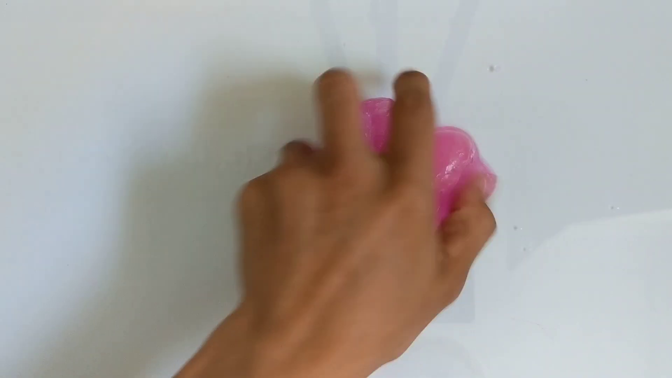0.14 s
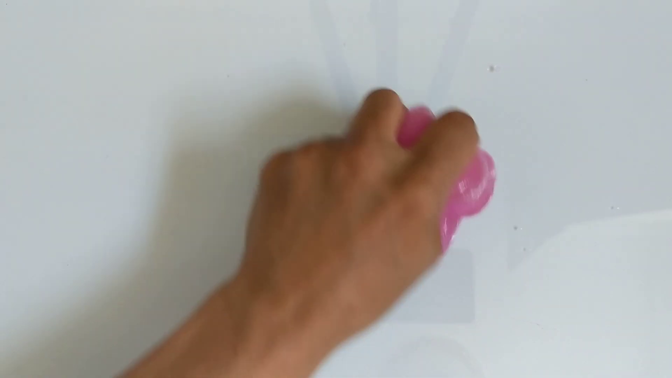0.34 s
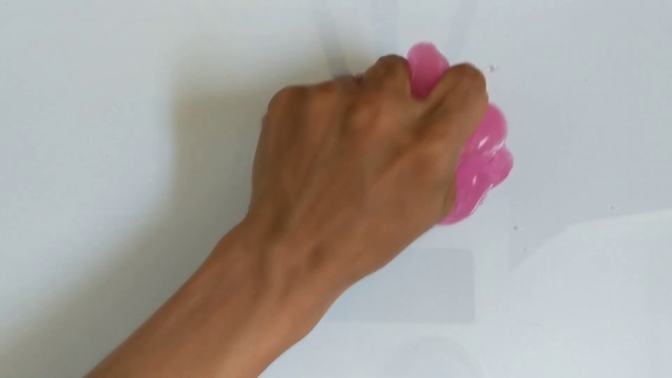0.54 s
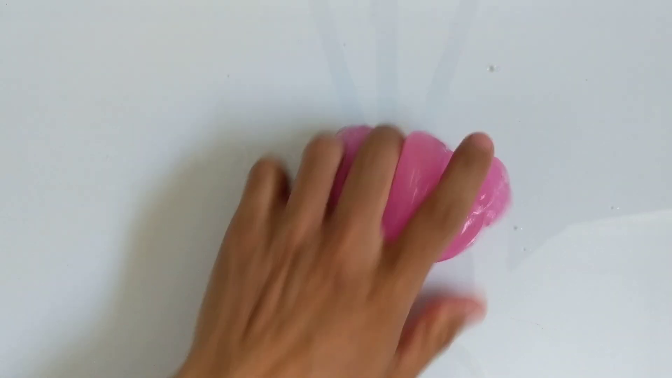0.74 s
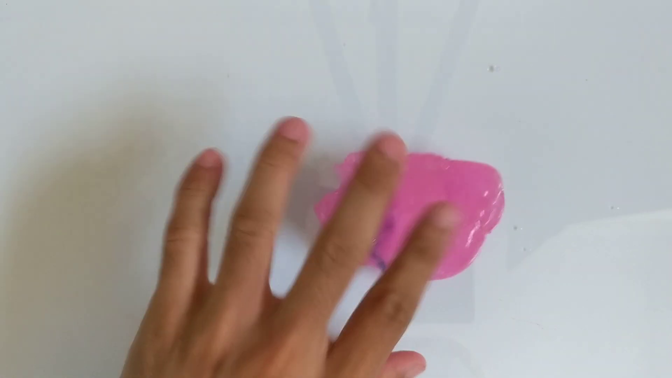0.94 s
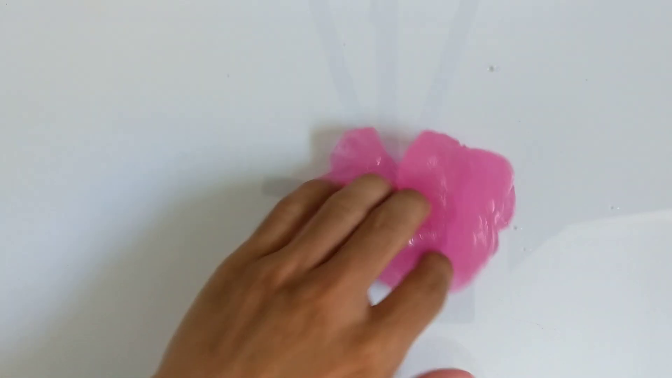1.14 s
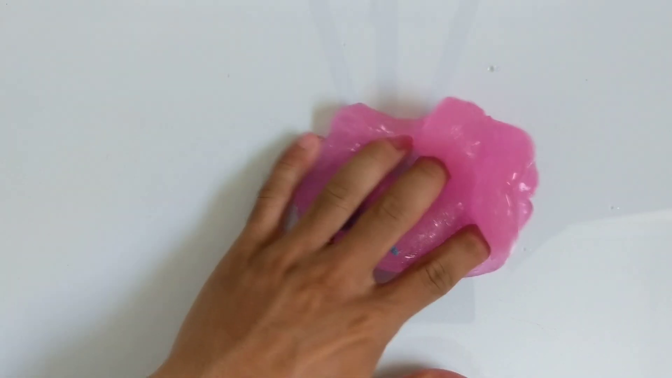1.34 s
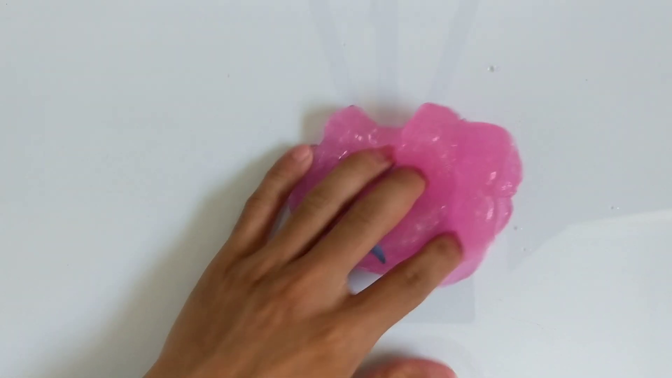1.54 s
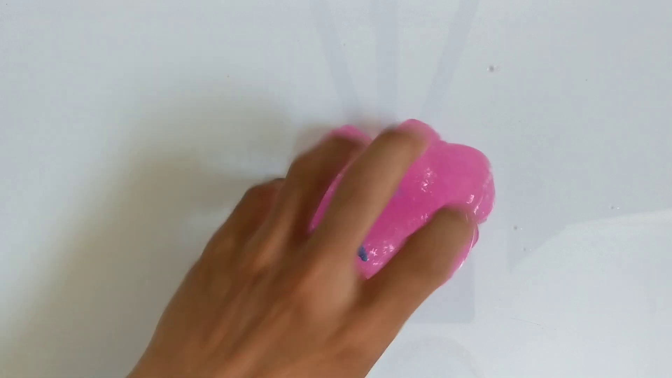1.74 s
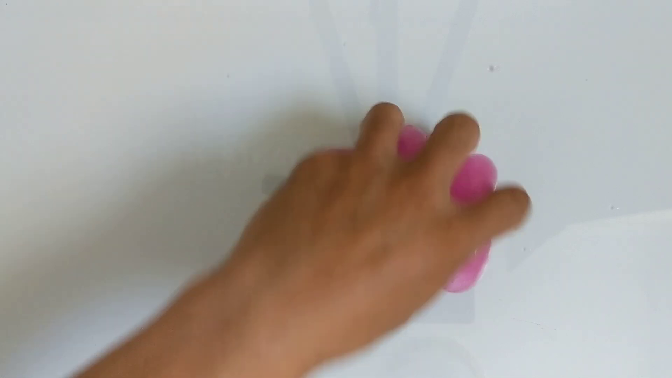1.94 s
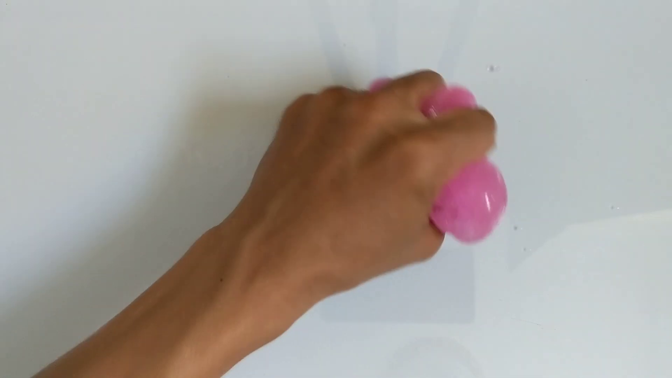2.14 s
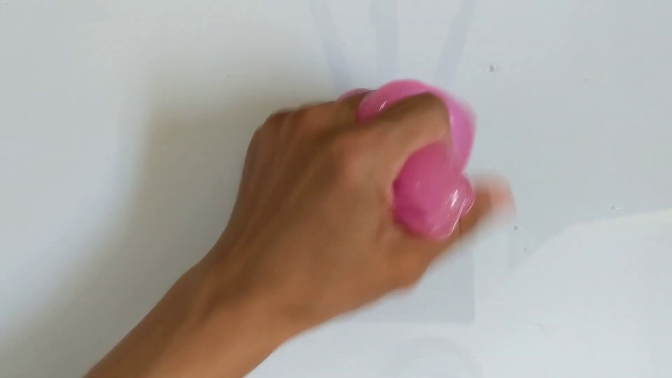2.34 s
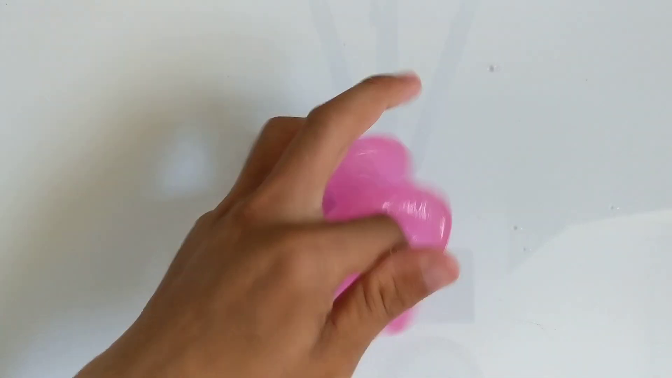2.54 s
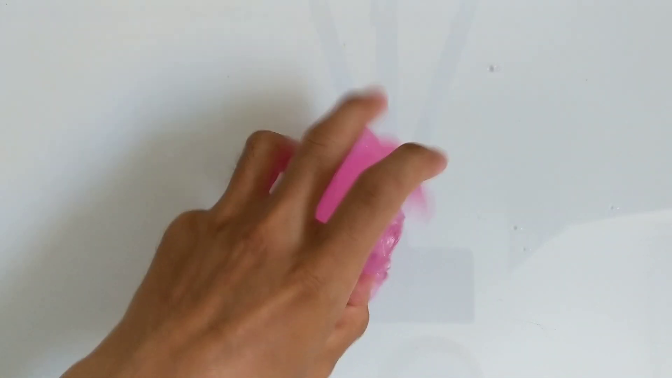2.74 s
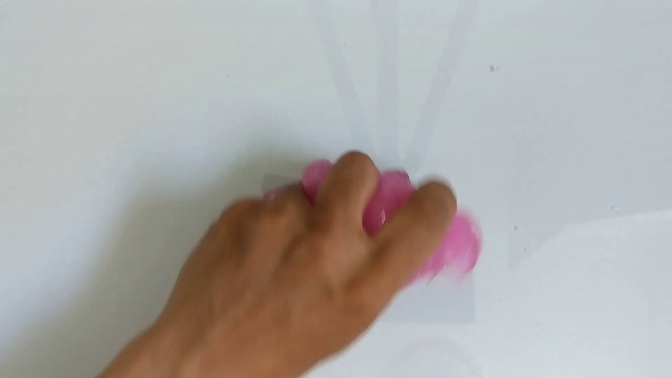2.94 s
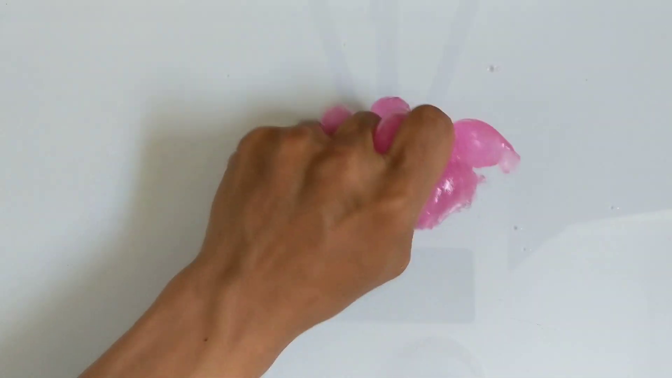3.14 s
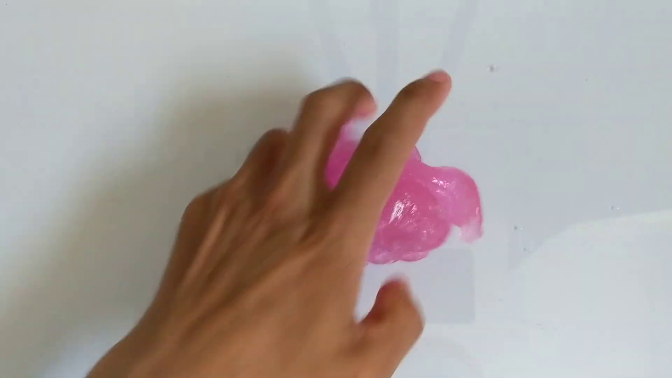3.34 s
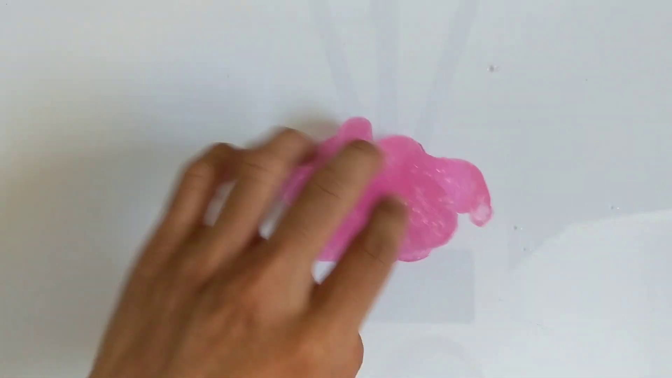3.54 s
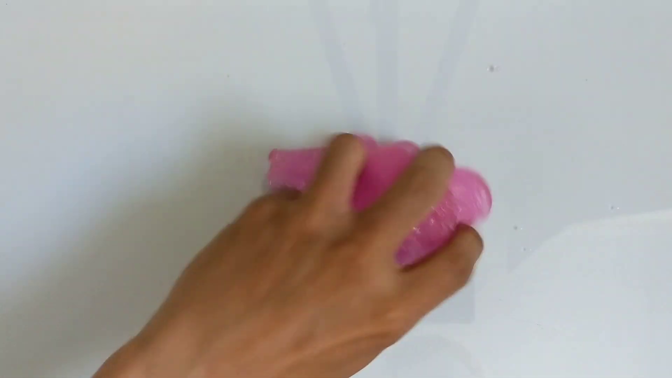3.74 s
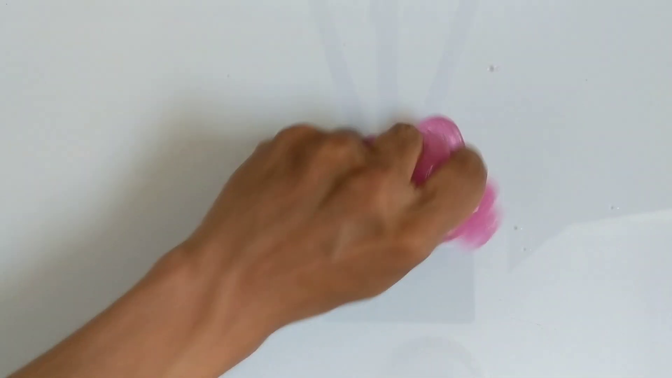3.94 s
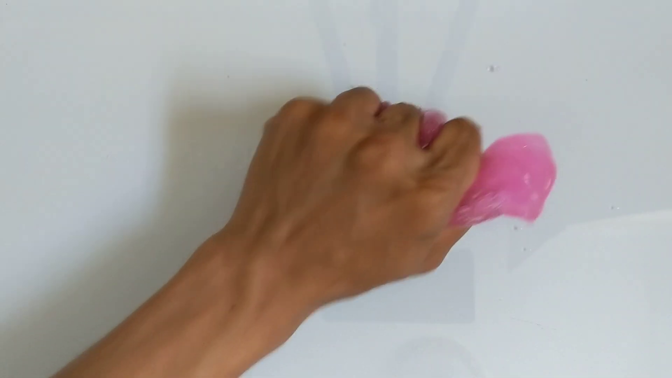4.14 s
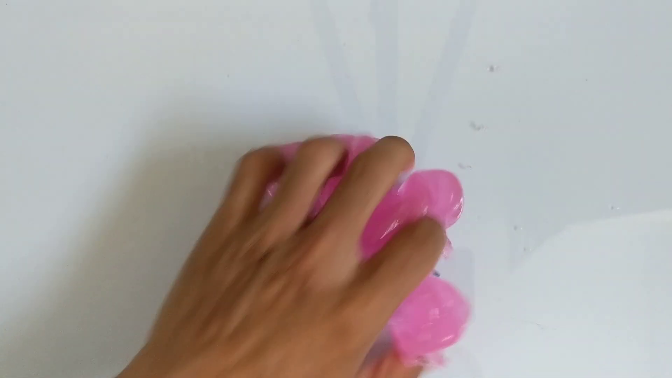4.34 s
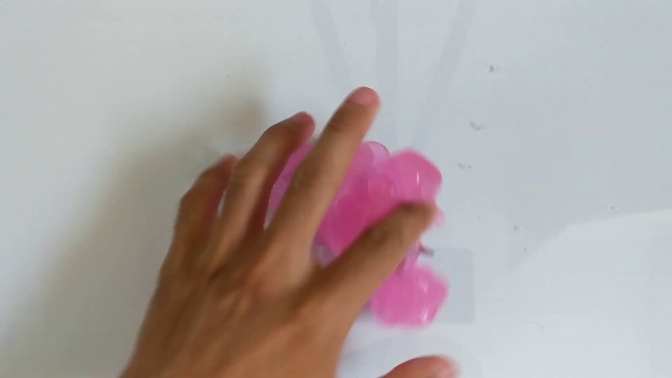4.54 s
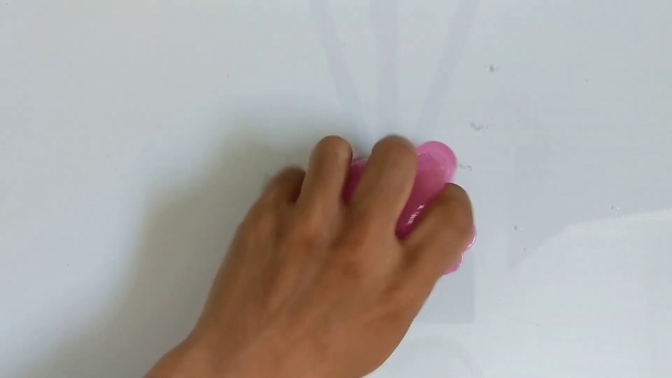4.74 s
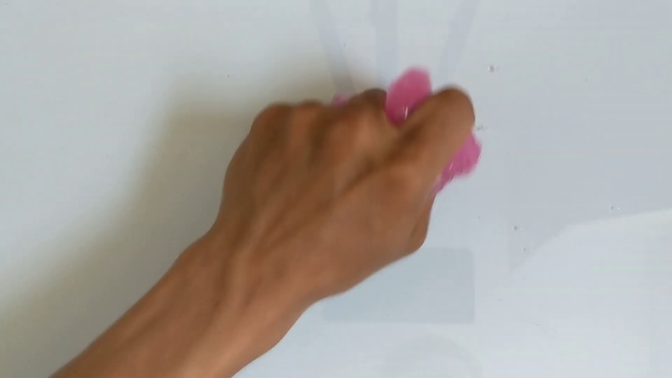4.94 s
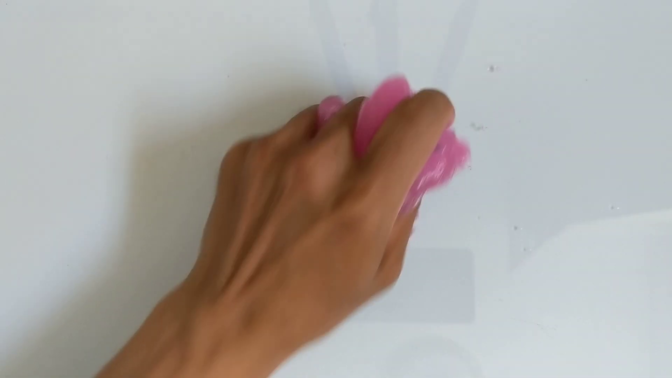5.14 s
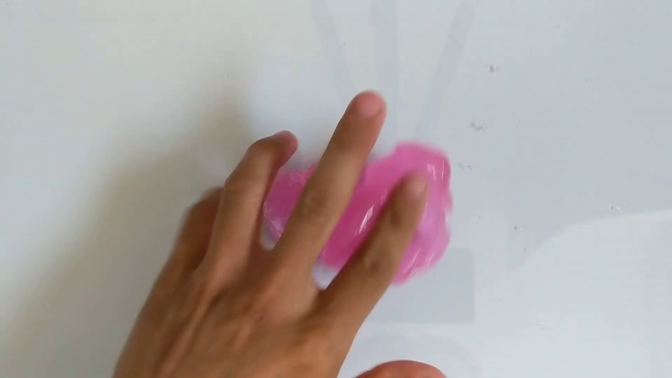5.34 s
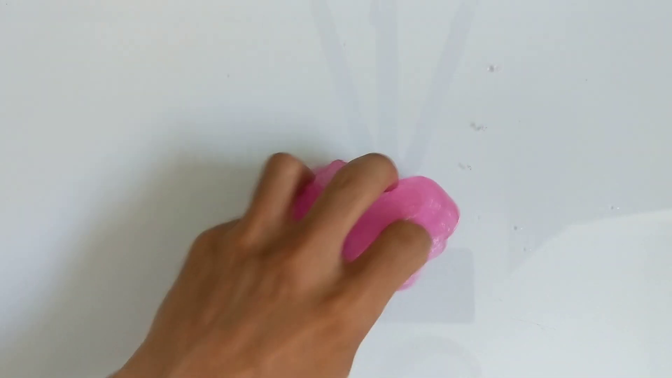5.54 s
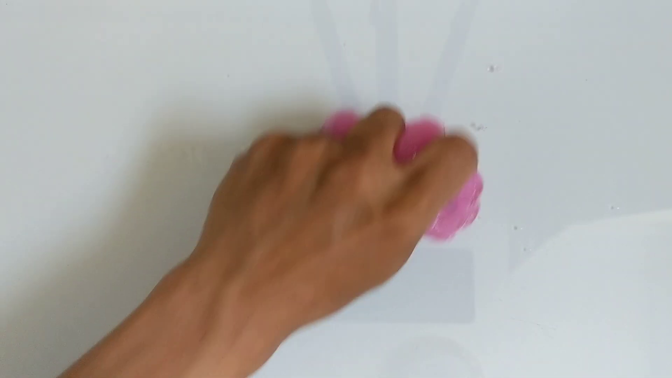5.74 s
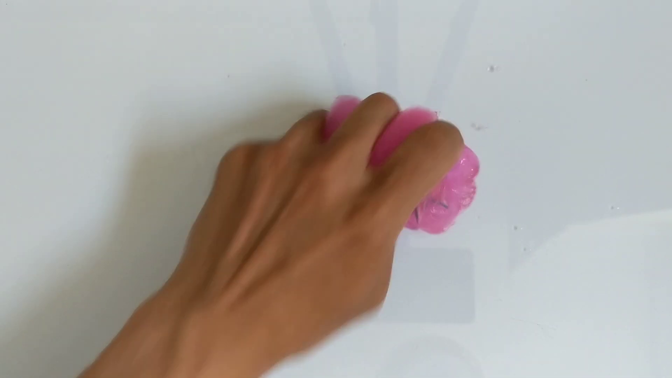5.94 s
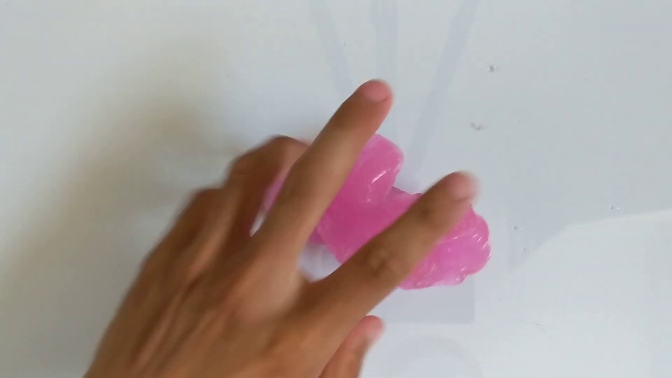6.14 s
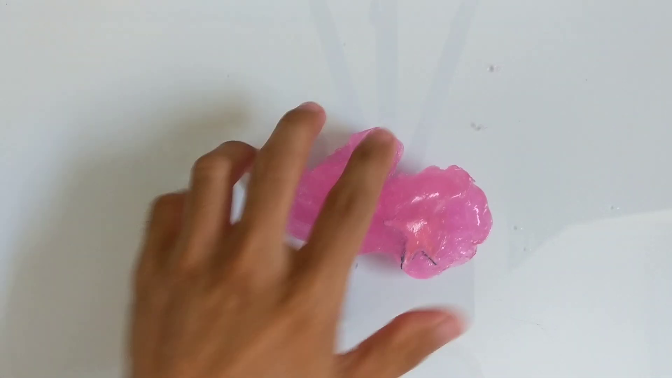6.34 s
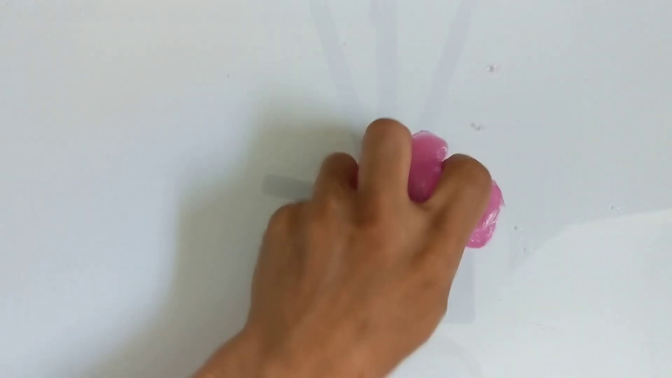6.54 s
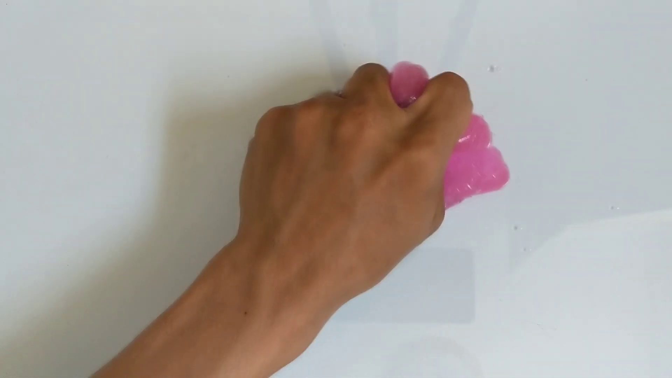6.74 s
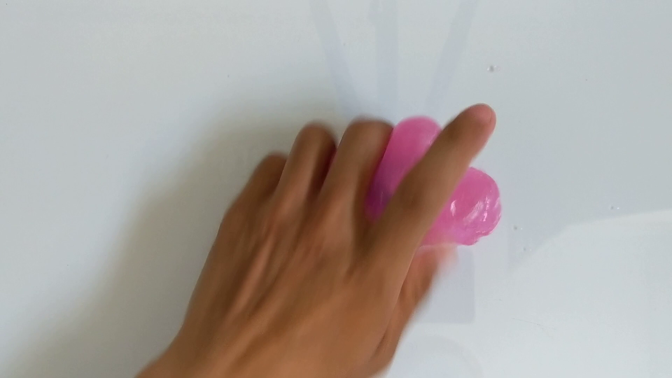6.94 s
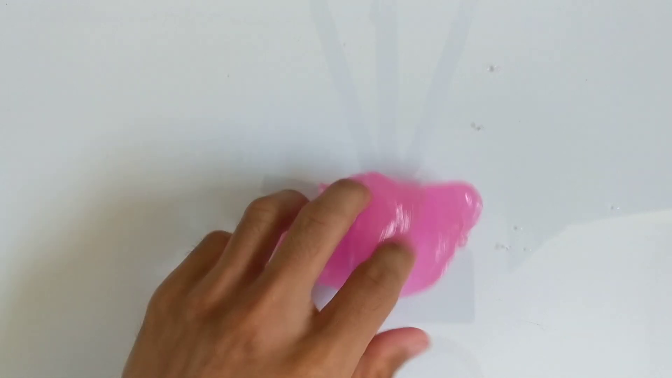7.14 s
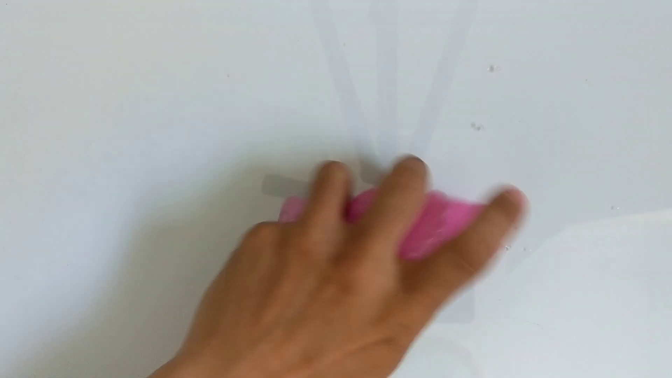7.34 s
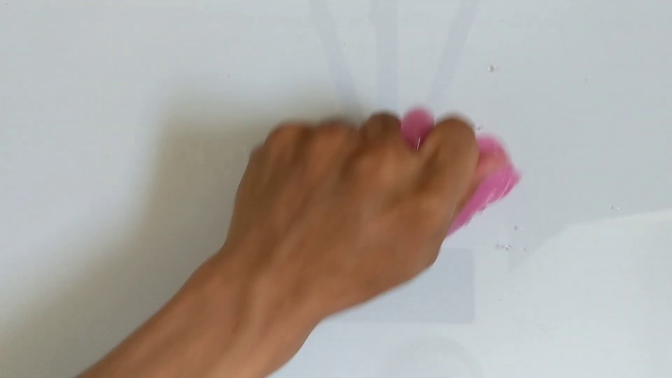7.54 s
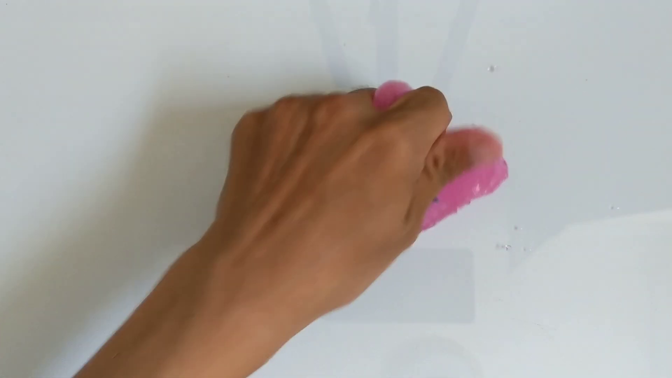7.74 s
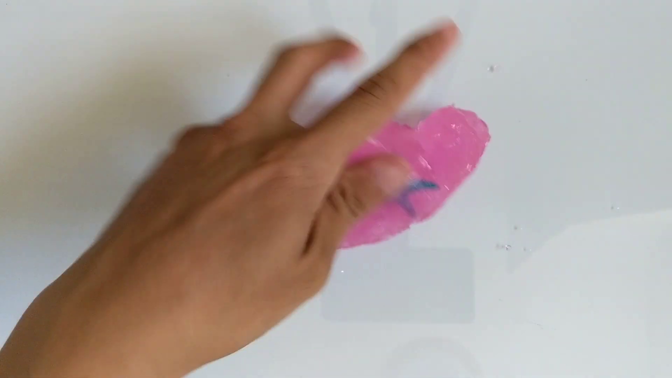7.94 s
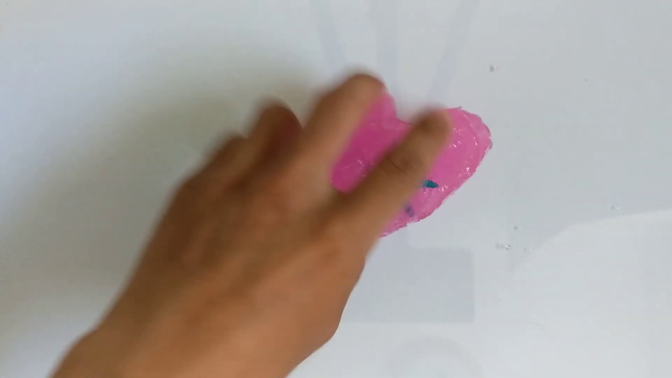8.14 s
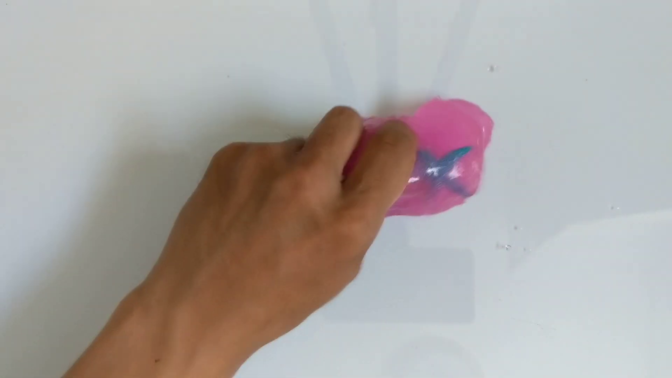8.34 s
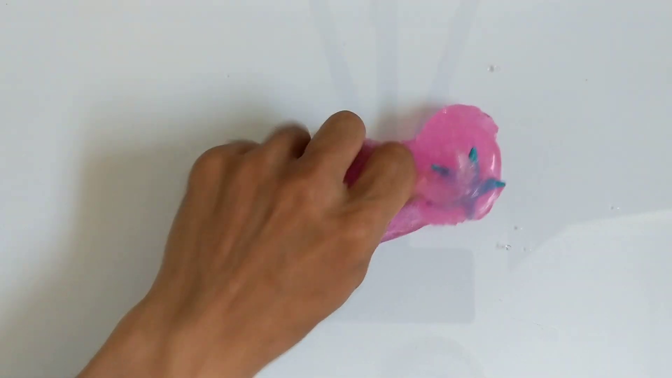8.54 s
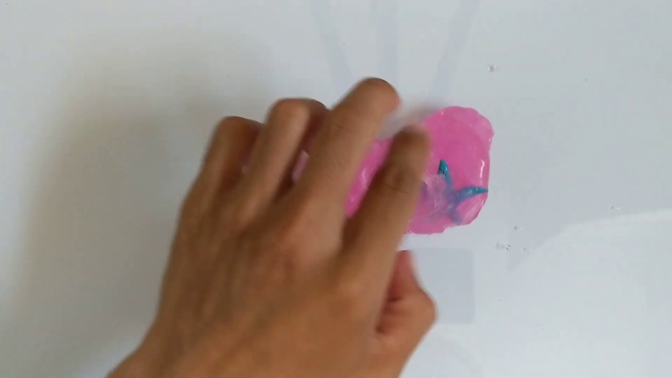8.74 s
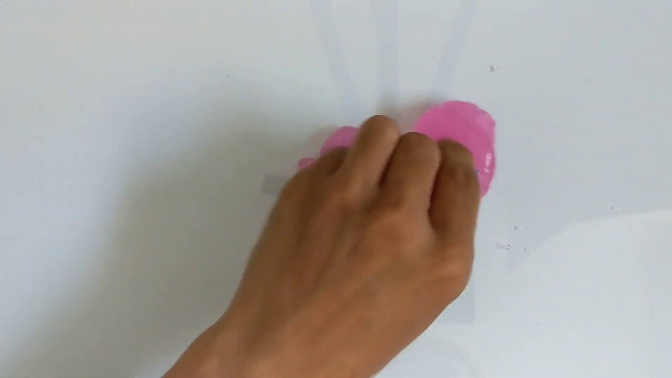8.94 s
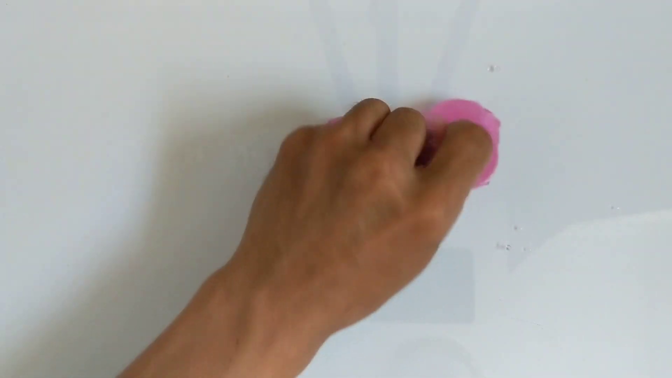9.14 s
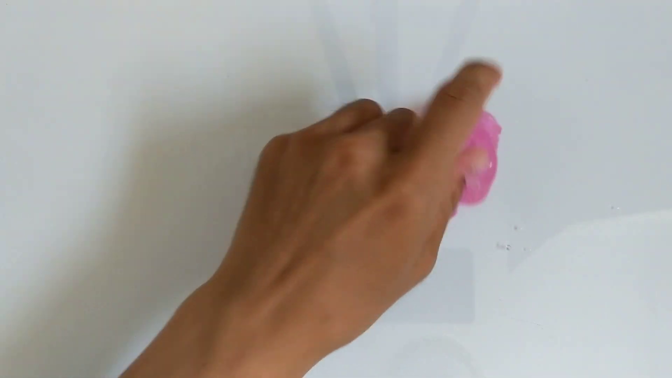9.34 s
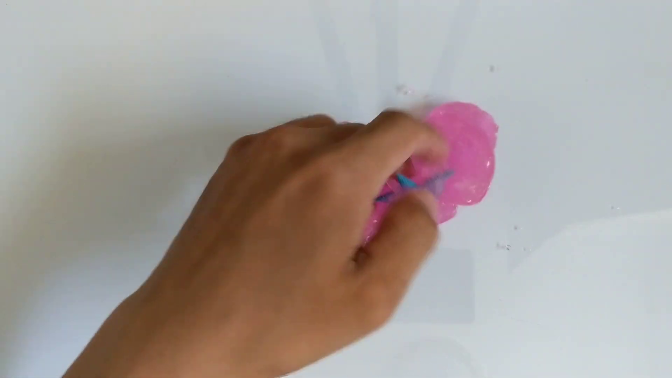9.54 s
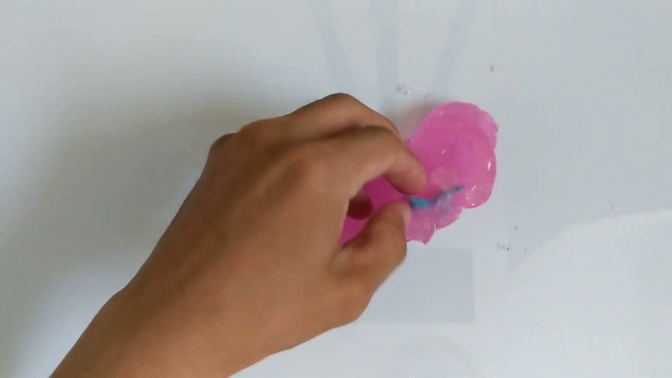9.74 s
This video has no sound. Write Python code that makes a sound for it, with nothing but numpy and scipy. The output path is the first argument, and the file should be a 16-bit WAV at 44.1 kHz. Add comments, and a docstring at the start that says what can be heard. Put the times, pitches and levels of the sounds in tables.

```python
"""A small, live room: a hand kneads sticky slime on a hard tabletop.
Each squeeze bursts trapped air pockets, which pop at their own pitch; the table mirrors them and the
walls ring on. Between pops the slime squeaks, squelches and crackles as it peels off skin and table.
Once the heel of the hand judders on the table. Low rumble, hiss and a brief faint hum lie beneath."""
import sys
import numpy as np
from scipy import signal
from scipy.fft import rfft, irfft, next_fast_len
from scipy.io import wavfile
from scipy.ndimage import uniform_filter1d, map_coordinates

SR = 44100
rng = np.random.default_rng(int(sys.argv[2]) if len(sys.argv) > 2 else 0)


def wav_record(signal):
    """Record a signal, one row per channel, as 16-bit PCM in the file named by sys.argv[1]."""
    frames = np.transpose(np.atleast_2d(signal))
    bounded = np.clip(frames, -1, 1)
    # unit amplitude maps onto the largest positive 16-bit level
    quanta = np.round(bounded * 32767).astype(np.int16)
    wavfile.write(sys.argv[1], SR, quanta)


N = 435266
TOP_HZ = 17200

# tearing film: f/Hz, level/dB
SNAP_SPECTRUM = [(100, -21), (300, -44), (1200, -12), (5000, 3.5), (9000, -2), (16000, -12)]
# large pockets, two rows for a double one: t/s, ring level/dB, f/Hz, decay/cycles, snap level/dB
POPS = [(.383, -13.5, 7160, 1.2, -28), (.723, -28, 5330, 1.8, -55), (0.7676, -23.5, 2930, 7.7, -50),
        (0.767, -14.5, 1310, 2.3, -29), (.7695, -35, 765, 2.2, -50), (1.297, -17.5, 7400, 0.59, -37),
        (1.3487, -22, 5170, 1.4, -43), (1.359, -25, 7000, 1, -38), (1.3708, -13.5, 3170, 0.58, -30),
        (1.371, -25.5, 1170, 2.6, -39), (1.3958, -11.5, 3000, 1.5, -17), (1.419, -15, 10500, 1, -35),
        (1.424, -7.5, 6330, 0.75, -33), (1.4653, -6, 5300, 2, -48), (1.4657, -10.5, 10100, 1.5, -48),
        (1.47, -12, 9100, 0.78, -36), (2.028, -24, 6990, 1.4, -44), (2.125, -21, 6680, .8, -44),
        (2.066, -31, 900, 0.9, -40), (2.2116, -12.5, 2060, 1.1, -30), (2.2104, -8.5, 3970, 1.6, -27),
        (2.2258, -24, 9000, .8, -24), (2.243, -15, 6050, 7.8, -23), (2.2826, -3.5, 6940, 2, -36),
        (2.4419, -23.5, 2840, 1.8, -36.5), (2.4852, -16, 7530, 1.1, -50), (2.639, -23.5, 5300, 2.1, -39),
        (3.0422, -26, 4330, 1.7, -48), (3.101, -5.5, 4520, 1.9, -22), (3.162, -23, 11000, .8, -34),
        (3.1732, -17, 2630, 1.8, -31), (3.1967, -6.5, 9300, 1.3, -33), (3.3778, -23.5, 1800, 3.2, -46),
        (3.841, -22, 7600, 2.7, -40.5), (3.861, -25, 1530, 0.44, -48), (3.956, -10.5, 2880, 2.2, -41),
        (3.978, -14.5, 2480, 1.6, -33), (3.9978, -9.5, 6240, 2.3, -19), (3.9984, -15, 8060, 0.94, -18.5),
        (4.039, -6.5, 4300, 1.95, -29), (4.0824, -14, 2600, 2.1, -40), (4.0833, -18.5, 5100, 11, -44),
        (4.1332, -8, 8300, 0.54, -32), (4.1764, -15, 11600, 1.3, -31), (4.197, -24, 4100, 2, -44),
        (4.25, -15.5, 10200, 4, -30.5), (4.375, -25.5, 1395, 0.92, -39), (4.492, -19.5, 4870, 0.84, -47),
        (4.8584, -13, 1440, 1.43, -47), (4.91, -8, 3170, 2.1, -40), (4.9102, -9, 5700, 1.3, -48),
        (4.9119, -13, 3220, 2.2, -42), (4.96, -18.5, 7850, 2.8, -43), (4.969, -20, 7200, 2.2, -41),
        (5.0728, -14.5, 4130, 0.57, -61), (5.1083, -17.5, 4470, 0.63, -40), (5.232, -29, 6470, 1.6, -50),
        (5.421, -31.5, 3700, 4, -52), (5.483, -25.5, 2200, 0.46, -55), (5.7873, -7, 5170, 2.3, -26.5),
        (6.497, -29.5, 1020, 0.49, -51), (6.571, -22, 6950, 1.2, -42), (6.6415, -21, 10500, 1, -47),
        (6.6944, -19.5, 1570, 0.97, -54), (6.77, -21.5, 2700, 0.63, -46), (6.941, -17, 6660, 3.2, -37),
        (6.973, -14, 2700, 1.8, -38), (6.973, -22, 1270, 2.2, -46), (6.9788, -16, 1130, 3.2, -46),
        (6.9798, -31, 620, 2.3, -42), (6.9796, -18.5, 2500, 6.5, -38), (6.9808, -12, 3000, 3.5, -24.5),
        (7.5843, -7, 4840, 1.15, -33), (7.585, -21, 1040, .6, -45), (7.586, -7.5, 4260, 2, -18.5),
        (7.63, -31, 800, 1, -50), (7.6437, -13.5, 2360, 1.2, -36), (7.6677, -10.5, 7400, 2.5, -23.5),
        (7.717, -20.5, 2210, 1.2, -41), (7.77, -32, 1270, 1.5, -54), (8.41, -32, 2160, .9, -43),
        (8.452, -27, 4800, 1.1, -37), (8.5002, -9.5, 6600, 1.2, -30), (8.5032, -16, 4950, 2.3, -37),
        (8.804, -29, 5800, 5, -58), (9.095, -38, 1050, .7, -58), (9.103, -33.5, 7400, 2.3, -50),
        (9.2234, -36.5, 830, 1.3, -55), (9.25, -20, 9000, 1.1, -46), (9.272, -31.5, 3600, 4, -48),
        (9.392, -40, 5230, 1.6, -39.5)]

def pops():
    """The film strains and tears with a snap, and the opened pocket rings."""
    strain_s, tear_s = 0.00062, 0.00074
    lead = SR // 200
    track, t = np.zeros(N), np.arange(-lead, SR // 40) / SR
    tear = np.exp(np.where(t < 0, t / strain_s, -t / tear_s))
    for s, ring_db, hz, cycles, snap_db in POPS:
        ring = cavity(np.maximum(t, 0), hz, max(cycles, .5), glide=rng.normal(0, 0.053))
        snap = noise(SNAP_SPECTRUM, len(t)) * tear
        add(track, s - lead / SR, amp(ring_db - 1) * ring + amp(snap_db - 1.5) * snap)
    return track

def cavity(t, hz, cycles, glide):
    """An opened air pocket rings for a few cycles; its pitch slides as the hole changes size."""
    turns = hz * t
    phase = turns * (1 + glide * np.tanh(turns / cycles / 2))
    onset = 1 - np.exp(-2.6 * turns / np.sqrt(cycles))
    return np.sin(2 * np.pi * phase) * onset * np.exp(-turns / cycles)

# bubble clusters: t/s, length/s, gurgle level/dB, gurgle f/Hz, crackle level/dB, crackle f/Hz
SQUELCHES = [(0.3825, 0.013, -42.5, 1410, -34, 6540), (0.758, 0.014, -37.5, 1840, -45, 3640),
             (1.705, 0.032, -51, 1800, -53, 7600), (2.29, 0.0052, -62, 2600, -29.5, 7460),
             (2.488, 0.028, -44.5, 1450, -55, 5000), (2.925, 0.023, -54.5, 2000, -45, 6640),
             (2.973, 0.0086, -42.5, 1960, -38.5, 3900), (3.074, 0.01, -53, 2200, -39, 5770),
             (3.092, 0.012, -35.5, 2310, -30, 4600), (3.336, 0.0068, -60, 1800, -49, 4500),
             (3.377, 0.017, -49, 1580, -58, 4530), (3.977, 0.021, -39, 1600, -38, 5840),
             (4.841, 0.013, -47, 1500, -58, 4000), (4.869, 0.041, -40.5, 1550, -44.5, 4070),
             (4.955, 0.011, -58, 2010, -51, 7440), (5.303, 0.038, -49, 2350, -47, 4570),
             (5.767, 0.01, -45, 1890, -35.5, 8150), (5.823, 0.0084, -36.5, 1680, -30, 5160),
             (6.055, 0.019, -39.5, 1440, -36, 6240), (6.143, 0.019, -58, 1930, -46, 5800),
             (6.572, 0.0044, -48, 1300, -49, 5200), (6.822, 0.026, -40.5, 1700, -43.5, 2860),
             (6.961, 0.021, -48, 1500, -41, 5500), (6.973, 0.012, -30.5, 2730, -58, 3000),
             (7.621, 0.029, -49, 1550, -37, 4200), (7.755, 0.016, -44, 1820, -49, 3500),
             (7.933, 0.019, -47, 1630, -40, 3550), (8.063, 0.014, -45.5, 3400, -50, 4830),
             (8.472, .008, -58, 2200, -42, 6500), (8.498, 0.0091, -49.5, 1210, -32, 6560),
             (8.791, 0.016, -69, 1800, -53.5, 6000), (9.22, 0.0081, -56, 1500, -42, 8600)]

def squelches():
    """A foamy patch collapses: a short volley of like-sized gurgles and scattered crackle."""
    track = np.zeros(N)
    for s, length, gurgle_db, gurgle_hz, crackle_db, crackle_hz in SQUELCHES:
        size = max(int(length * SR), 1)
        gurgle = bubbles(size, per_s=2600, hz=gurgle_hz, spread=0.17, cycles=2.1, scatter_db=4)
        crackle = bubbles(size, per_s=3500, hz=crackle_hz, spread=0.507, cycles=2.4, scatter_db=5.5)
        add(track, s, amp(gurgle_db) * gurgle + amp(crackle_db) * crackle)
    return track

# wet slime muffles the largest and tiniest bursts: f/Hz, level/dB
WET_DAMPING = [(600, -2.5), (1400, -5), (7500, 2), (11000, -0.5), (16000, -9)]

def bubbles(size, per_s, hz, spread, cycles, scatter_db):
    """A swarm of tiny bursts, rms 1: log-normal pitches, a few loud among many faint."""
    count = max(int(per_s * size / SR), 3)
    when, strength, slide = rng.random((count, 3)).T
    pitch = hz * np.exp(spread * np.clip(rng.standard_normal(count), -2, 2))
    gain = amp(scatter_db * np.minimum(-np.log(1 - strength), np.pi))
    gain *= (pitch / hz) ** .3 * amp(along(WET_DAMPING, pitch)) * (pitch < TOP_HZ)
    steps = np.arange(256)
    grains = gain[:, None] * cavity(steps / SR, pitch[:, None], cycles, 0.29 * (slide[:, None] - .5))
    positions = (when * size).astype(int)[:, None] + steps
    return unit(np.bincount(positions.ravel(), grains.ravel(), size + len(steps)))

# fingers close, pressure builds: t/s, length/s, final gurgle level/dB, final crackle level/dB
SQUEEZES = [(.31, 0.12, -46.5, -49), (1.31, 0.1, -45.5, -43.5), (2.03, 0.1, -48.5, -43.5),
            (2.21, 0.047, -48.5, -39), (2.97, 0.24, -54, -47), (3.87, 0.076, -52, -49.5),
            (3.97, 0.12, -49, -40.5), (4.79, 0.061, -50.5, -51.5), (4.87, 0.095, -60, -42.5),
            (5.68, 0.22, -47, -48), (6.57, 0.049, -50, -45), (6.69, 0.115, -48.5, -48.5),
            (7.59, 0.1, -45, -41.5), (8.35, 0.16, -52, -50.5), (9.195, 0.062, -60, -46)]
# fingers peel off, contact shrinks: t/s, length/s, first gurgle level/dB, first crackle level/dB
PEELS = [(0, 0.056, -52.5, -50), (.54, 0.11, -53, -48), (.775, 0.086, -43, -41), (1.69, 0.13, -55.5, -51),
         (2.487, 0.11, -53, -44), (2.63, 0.35, -61.5, -58.5), (3.38, 0.058, -48.5, -41.5),
         (4.33, 0.16, -48.5, -42.5), (5.03, 0.085, -46.5, -48), (5.26, 0.2, -51, -49),
         (6.08, 0.13, -49.5, -45.5), (6.99, 0.051, -41.5, -36.5), (7.27, 0.17, -62, -55.5),
         (7.85, 0.23, -61, -51.5), (8.67, 0.13, -63, -54), (9.38, 0.15, -79, -57.5)]

def kneading():
    """Larger pockets gurgle inside the lump while its sticky surface crackles."""
    creep = amp([[-74], [-68]])  # gurgle, crackle between strokes
    gurgle_gain, crackle_gain = strokes(SQUEEZES, change_db=6) + strokes(PEELS, change_db=-10.5) + creep
    gurgle = bubbles(N, per_s=450, hz=1754, spread=0.33, cycles=1.4, scatter_db=4.5)[:N]
    crackle = bubbles(N, per_s=950, hz=5344, spread=0.524, cycles=2.2, scatter_db=5)[:N]
    return yielding() * (gurgle_gain * gurgle + crackle_gain * crackle)

def strokes(rows, change_db, attack_s=0.029, release_s=0.031):
    """Gurgle and crackle gains: the slime starts to move, swells or fades, then settles."""
    gains, t = np.zeros((2, N)), np.arange(N) / SR
    for s, length, gurgle_db, crackle_db in rows:
        edges = np.exp(np.minimum(t - s, 0) / attack_s - np.maximum(t - s - length, 0) / release_s)
        ramp = amp(change_db * np.clip((t - s) / length, 0, 1) - max(change_db, 0))
        gains += amp([[gurgle_db], [crackle_db]]) * edges * ramp
    return gains

def yielding(depth_db=1.5, knots_per_s=25):
    """The slime gives in fits and starts: a smooth random gain around 1."""
    knots = np.arange(N) * knots_per_s / SR
    return amp(depth_db * map_coordinates(rng.standard_normal(1024), [knots], mode="wrap"))

# pinhole whistles: t/s, length/s, level/dB, start f/Hz, end f/Hz, relative octave level/dB
SQUEAKS = [(0.6198, 0.0038, -34, 2660, 2980, 1.5), (0.821, 0.024, -41.5, 1290, 1665, -16),
           (3.341, 0.0025, -26.5, 6760, 5300, -41), (3.342, 0.0027, -33.5, 5170, 3900, -42),
           (3.3746, 0.0056, -27.5, 1460, 1280, -31), (6.802, 0.0059, -35, 7430, 6850, 3),
           (6.826, 0.034, -38.5, 1314, 1193, -12), (9.226, 0.0011, -20, 8970, 7500, -40)]

def squeaks(flutter_depth=0.038, flutter_cycles=0.9):
    """Air forced through a pinhole flutters the film: a sliding, unsteady tone with its octave."""
    track = np.zeros(N)
    for s, length, db, start_hz, end_hz, octave_db in SQUEAKS:
        size = int(length * SR)
        flutter = 1 + flutter_depth * wavering(size, flutter_cycles * SR / start_hz)
        phase = 2 * np.pi * np.cumsum(np.linspace(start_hz, end_hz, size) * flutter) / SR
        tone = np.sin(phase) + amp(octave_db) * np.sin(2 * phase)
        air = amp(-23) * noise(SNAP_SPECTRUM, size)
        add(track, s, amp(db) * arch(size) * (tone + air))
    return track

# heel of the hand on the table: t/s, length/s, level/dB
JUDDERS = [(5.243, 0.11, -46), (5.368, 0.071, -42)]

def judder(table_hz=98, wander=0.12):
    """Skin sticks and slips under the hand's weight and drives the tabletop's lowest ring."""
    track = np.zeros(N)
    for s, length, db in JUDDERS:
        size = int(length * SR)
        hz = table_hz * (1 + wander * wavering(size, SR / table_hz))
        add(track, s, amp(db) * arch(size) * np.sin(2 * np.pi * np.cumsum(hz) / SR))
    return track

def table_echo(x, knead_hz=1.1):
    """The table returns each sound; the path changes as the lump is lifted and pressed."""
    now = np.arange(N)
    delay_s = .0016 + .0004 * np.sin(2 * np.pi * knead_hz * now / SR)
    return x + 0.3 * x[np.clip(now - (delay_s * SR).astype(int), 0, N - 1)]

# reverberation time: f/Hz, T60/s
ROOM_T60 = [(200, 0.33), (1200, 0.65), (3000, 0.66), (7000, 0.52), (15000, 0.36)]
# reverberation colour: f/Hz, level/dB
ROOM_SPECTRUM = [(300, 14), (1300, 1.5), (7000, 2.5), (15000, 4.5)]

def room(x, predelay_s=.0025):
    """The walls ring on; a fresh tail every quarter second stands for the hand moving about."""
    wet, block = np.zeros(N), SR // 4
    for start in range(0, N, block):
        hz, t, bins = signal.stft(rng.standard_normal(SR * 2 // 3), SR, nperseg=256)
        fade = 10 ** (-3 * t / along(ROOM_T60, hz)[:, None])
        early_boost = 1 + 1.57 * np.exp(-t / 0.0091)
        colour = amp(along(ROOM_SPECTRUM, hz))[:, None]
        tail = signal.istft(bins * fade * early_boost * colour, SR)[1]
        tail /= np.linalg.norm(tail)
        add(wet, start / SR + predelay_s, signal.fftconvolve(x[start:start + block], tail))
    return wet

# room hiss and rumble spectra: f/Hz, density level/dB
HISS_SPECTRUM = [(20, -48), (45, -8), (190, -7.5), (240, -9), (400, -9.5), (900, -15), (1300, -16.5),
                 (3400, -27), (8000, -32.5), (17000, -28.5)]
RUMBLE_SPECTRUM = [(20, -38), (40, -5), (62, -6), (80, -8), (98, 5), (125, -2.5), (160, -3), (220, -16),
                   (500, -38)]
# rumble and hum envelopes: t/s, level/dB
RUMBLE_LEVELS = [(0, -53.5), (2.3, -53.5), (2.9, -56.5), (4.4, -53), (5.1, -55.5), (5.3, -53), (5.5, -52.5),
                 (6.15, -51.5), (6.5, -57), (8.7, -58.5), (9.87, -63.5)]
HUM_LEVELS = [(8.7, -100), (8.95, -65.5), (9.4, -66), (9.6, -100)]

def background(hum_hz=262):
    """Steady room hiss, a slowly changing rumble and, near the end, a faint distant hum."""
    t = np.arange(N) / SR
    hiss = amp(-59.5) * noise(HISS_SPECTRUM, N)
    rumble = amp(np.interp(t, *np.transpose(RUMBLE_LEVELS)) - 2) * noise(RUMBLE_SPECTRUM, N)
    hum = amp(np.interp(t, *np.transpose(HUM_LEVELS))) * np.sin(2 * np.pi * hum_hz * t)
    return hiss + rumble + hum

def amp(db):
    """Decibels to gain."""
    return 10 ** (np.asarray(db) / 20)

def unit(x):
    """Scale to rms 1."""
    return x / np.sqrt(np.mean(x ** 2) + 1e-20)

def along(points, hz):
    """Read (f/Hz, value) points on a log axis."""
    f, values = np.transpose(points)
    return np.interp(np.log(hz + 1), np.log(f + 1), values)

def filtered(x, response):
    """Apply a frequency response."""
    size = next_fast_len(len(x) + 4096)
    return irfft(rfft(x, size) * response(np.fft.rfftfreq(size, 1 / SR)), size)[:len(x)]

def noise(spectrum, size):
    """Coloured noise, rms 1."""
    return unit(filtered(rng.standard_normal(size), lambda hz: amp(along(spectrum, hz))))

def wavering(size, span):
    """Random wander around zero, rms 1, smooth over span samples."""
    wander = uniform_filter1d(rng.standard_normal(size), size=max(int(span), 1))
    return unit(wander - wander.mean())

def arch(size):
    """Rounded rise and fall."""
    return np.sqrt(np.abs(np.sin(np.pi * np.linspace(0, 1, size))))

def add(track, s, sound):
    """Mix a sound into the track at time s."""
    start = max(round(s * SR), 0)
    part = track[start:start + len(sound)]
    part += sound[:len(part)]

def scene():
    """The slime close by, its echoes, the hand on the table and the quiet room."""
    sharp, soft = pops() + squeaks(), squelches() + kneading()
    slime = table_echo(sharp + amp(-6) * soft) + room(amp(-1) * sharp + amp(-4) * soft)
    # such small pockets radiate almost no bass
    slime = signal.sosfilt(signal.butter(2, 260, "highpass", fs=SR, output="sos"), slime)
    return (slime + judder() + background())[None]

def record(dry):
    """Brick-wall low-pass at TOP_HZ."""
    return filtered(dry[0], lambda hz: hz < TOP_HZ)[None]

dry = scene()
out = record(dry)
wav_record(out)
```